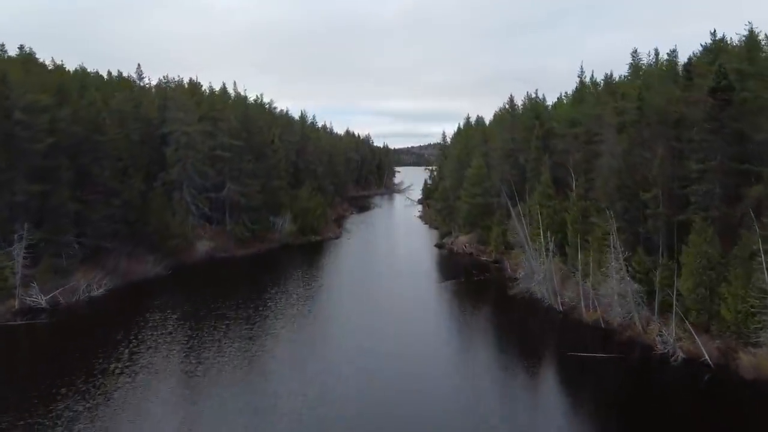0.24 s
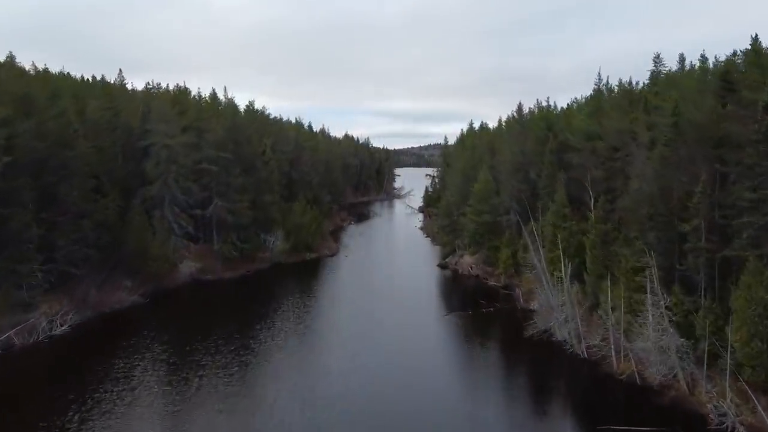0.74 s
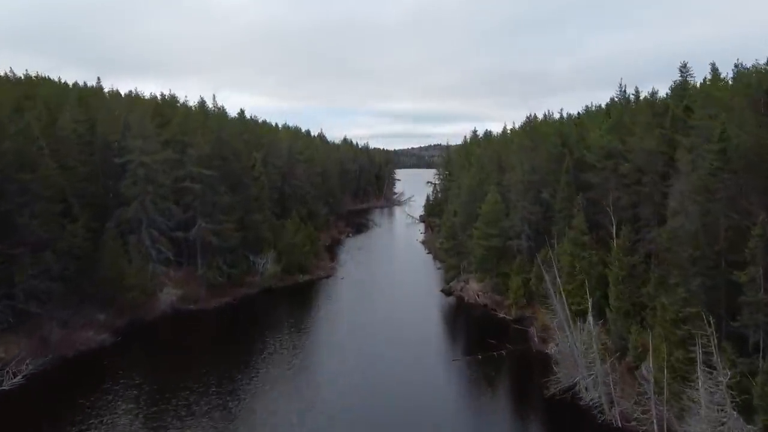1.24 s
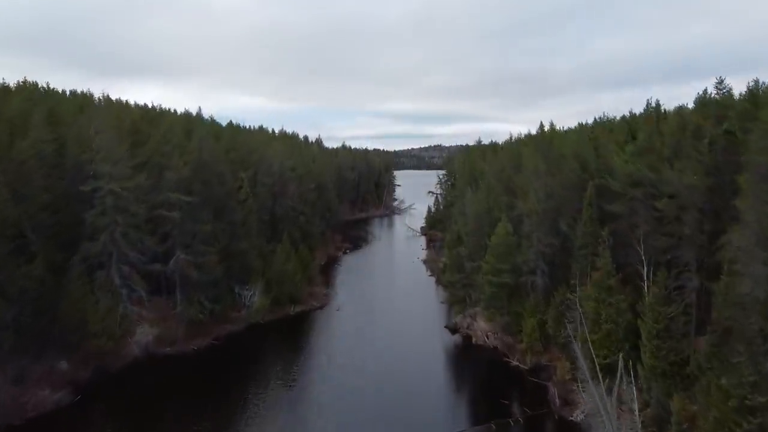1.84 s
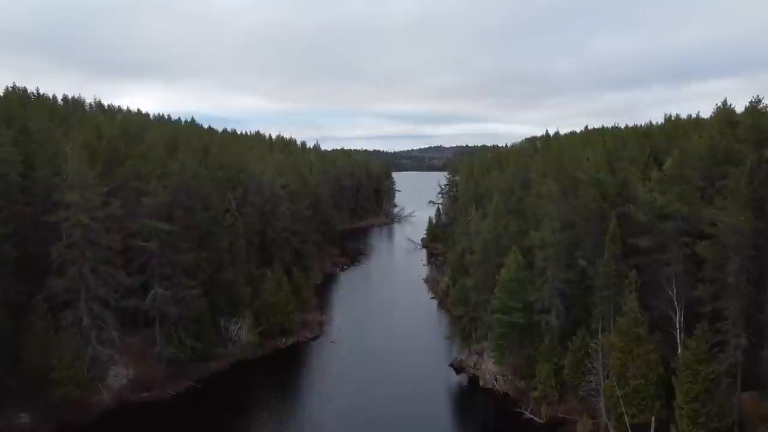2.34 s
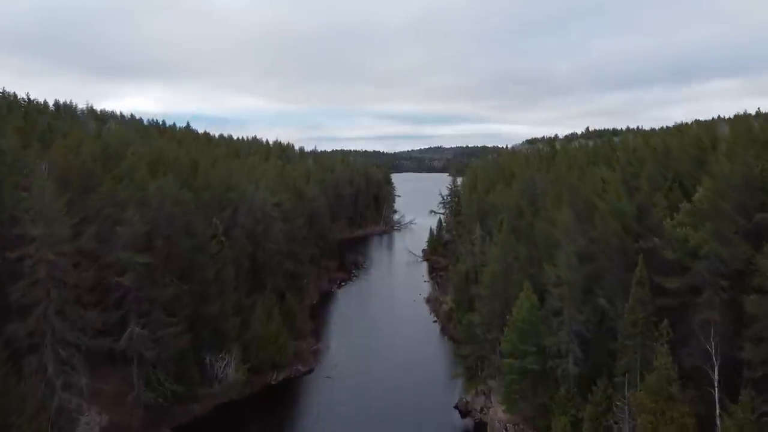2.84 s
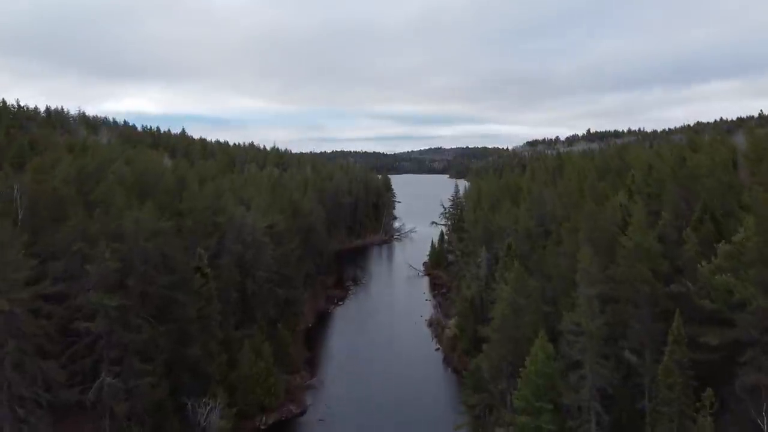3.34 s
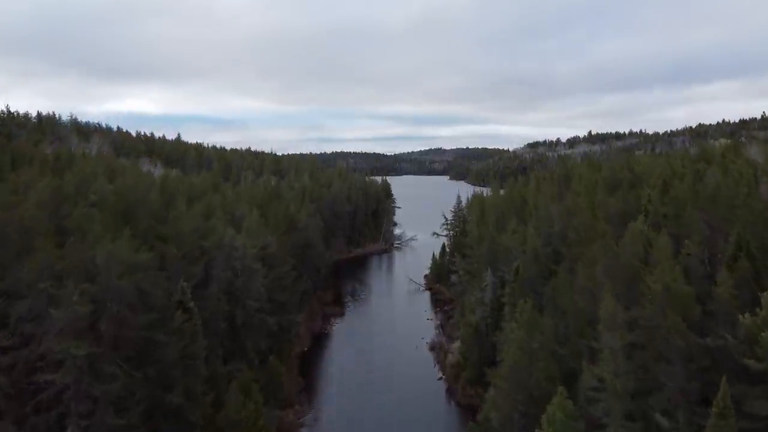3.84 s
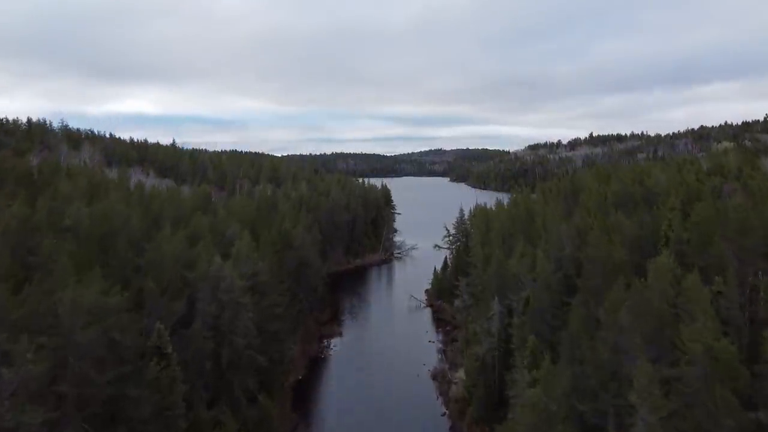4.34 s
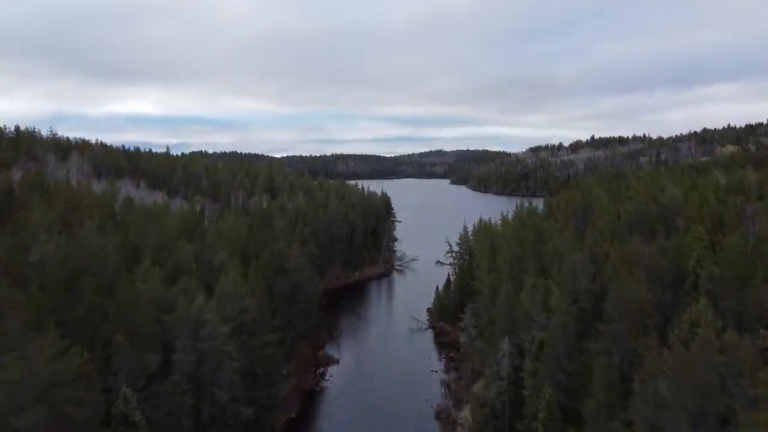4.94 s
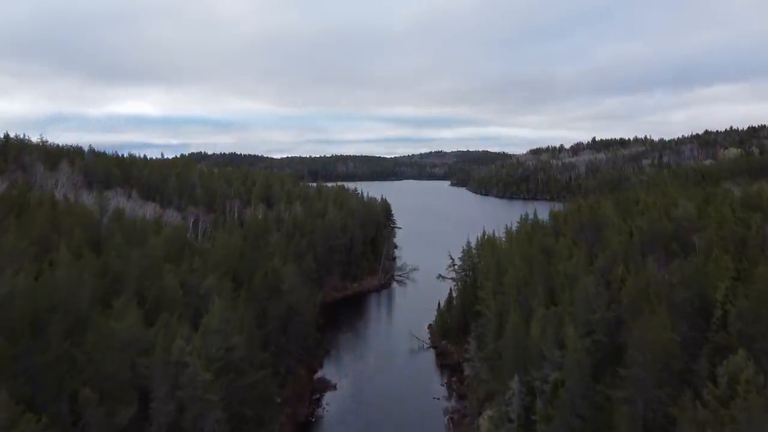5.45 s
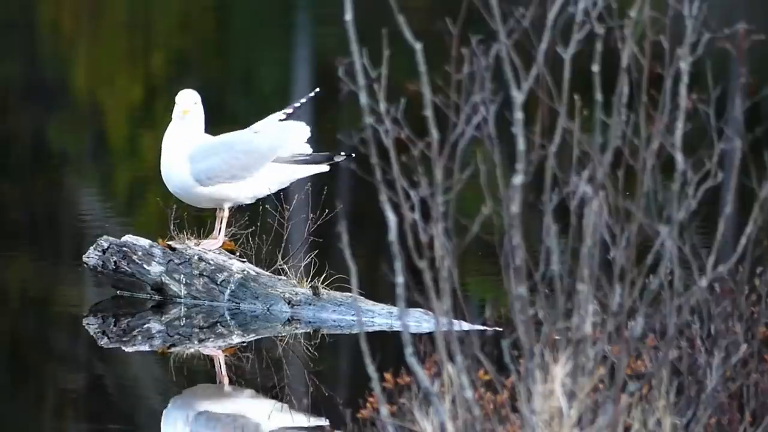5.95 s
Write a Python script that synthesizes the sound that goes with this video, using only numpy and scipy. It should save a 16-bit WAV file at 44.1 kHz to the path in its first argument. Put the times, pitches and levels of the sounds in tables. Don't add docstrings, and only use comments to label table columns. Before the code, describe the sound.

Clear whistled frog peeps ring out over a wooded lake, some steeply rising, some lower, with distant callers, brief croaks, a fast trill and long echoes.

```python
import sys
import numpy as np
from scipy import signal
from scipy.fft import rfft, irfft, next_fast_len
from scipy.io import wavfile
from scipy.ndimage import map_coordinates

SR = 44100
rng = np.random.default_rng(int(sys.argv[2]) if len(sys.argv) > 2 else 0)


def rack_gain(trim_db):
    fader = np.asarray(trim_db, float)
    return 10 ** (fader / 20)


def dump_mix(stems):
    frames = np.atleast_2d(stems).T
    limited = np.clip(frames, -1, 1)
    pcm = np.round(limited * 32767).astype(np.int16)
    wavfile.write(sys.argv[1], SR, pcm)


N = 273861
LEAD_S = 2.8
M = N + round(LEAD_S * SR) + SR // 2

# (frequency [Hz], density [dB per Hz])
AIR = [(15, -40), (54, -14), (110, -18), (300, -11), (500, -11), (900, -12), (2600, -17.5), (3700, -32)]
# (frequency [Hz], density [dB per Hz])
HISS = [(1000, -40), (3600, -27), (5500, -27), (9000, -24), (15000, -19), (16000, -20)]
AIR_DB = -59.5
DRONE_HZ, DRONE_WIDTH_HZ, DRONE_DB = 173, 25, -75.5

# (T60 [s], level [dB])
BANKS = [
    (.3, -27),
    (3.5, -24.3),
]

# (start [s], length [s], resting tone [Hz], level [dB])
RISING_PEEPS = [
    (.689, .209, 2440, -26),
    (1.993, .204, 2470, -26),
    (3.622, .201, 2455, -25.7),
    (4.699, .208, 2450, -26),
    (5.742, .213, 2425, -26),
    (-.3, .21, 2430, -25),
    (-1.6, .21, 2450, -25.5),
]
LOW_PEEPS = [
    (.97, .216, 2072, -21),
    (2.275, .224, 2075, -21),
    (3.319, .232, 2075, -21),
    (4.745, .234, 2078, -21),
    (6.026, .236, 2078, -21),
    (-.55, .22, 2075, -18.5),
    (-1.9, .23, 2075, -21),
]
# (lead [s], length [s], level re peep [dB])
RISING_CREAKS = [
    (.011, .008, -16),
]
LOW_CREAKS = [
    (.009, .003, -18),
    (.0045, .003, -14),
]
# (multiple of half the sac tone [1], level [dB])
RISING_ORDERS = [(1, -30), (2, 2), (3, -28), (4, -45), (5, -43), (6, -44), (7, -56)]
LOW_ORDERS = [(1, -32), (2, -0.5), (3, -29.5), (4, -38), (5, -51), (6, -55), (7, -50), (8, -57)]
FAR_ORDERS = [(1, -32), (2, 0), (3, -33), (4, -44), (5, -46)]
TRILL_ORDERS = [(1, -28), (2, 1), (3, -22), (4, -29), (5, -31), (6, -30), (7, -35), (8, -36)]
# (multiple of a third of the sac tone [1], level [dB])
SLIP_ORDERS = [(1, -46), (2, -25), (2.4, -30), (4, -32), (5, -40), (6, -43)]
# (delay [s], level [dB])
RISING_REEDS = [(.022, -18), (.043, -22), (.07, -26)]
LOW_REEDS = [(.009, -22), (.016, -21), (.045, -29)]
FAR_REEDS = [(.027, -19), (.061, -21)]
HOARSE_REEDS = [(.019, -17), (.032, -17), (.047, -20)]
# (centre [Hz], width [Hz], gain [dB])
GLARE = [(2615, 75, -4.5), (5250, 130, -7), (6250, 380, -11), (6750, 110, -8), (7450, 130, -9),
         (8300, 330, -12)]
RISING_VOICE = dict(climb_hz_per_s=2500, onset_hz=-50, settle_s=.006, tire_hz=35, tire_s=.025,
                    attack_db=15, attack_s=.009, bow_db=6, fullest=.55, release_db=5, release_s=.006)
LOW_VOICE = dict(climb_hz_per_s=1000, onset_hz=190, settle_s=.031, tire_hz=15, tire_s=.015,
                 attack_db=12, attack_s=.003, bow_db=8, fullest=.72, release_db=4, release_s=.007)
CRACK_DB, CRACK_S = -19, .005

# (start [s], length [s], first tone [Hz], last tone [Hz], level [dB])
FAINT_PEEPS = [
    (.8, .145, 2830, 3130, -47),
    (.945, .04, 3200, 3080, -49),
    (2.31, .057, 2320, 2570, -39),
    (2.69, .225, 2700, 3110, -49.5),
    (2.905, .035, 3140, 3000, -51),
    (4.26, .24, 2660, 3200, -47),
    (5.108, .037, 2580, 2740, -47),
    (6.13, .17, 2320, 2900, -41),
]
# (start [s], length [s], level [dB])
HIGH_PEEPS = [
    (1.05, .175, -36),
    (2.688, .182, -34.5),
    (4.41, .165, -34),
]
HIGH_FIRST_HZ, HIGH_LAST_HZ, HIGH_BEND, FAINT_BEND = 2795, 3365, 1.75, 1.21

# (start [s], length [s], pulse rate [Hz], level [dB], unsteadiness [0-1])
CROAKS = [
    (1.838, .026, 845, -54.5, .015),
    (1.861, .06, 730, -56, .1),
    (2.106, .028, 1052, -50, 0.22),
    (3.008, .035, 760, -54, .12),
    (3.05, .05, 800, -57, .25),
    (4.6, .041, 995, -46.5, .003),
    (4.641, .06, 1050, -53, .03),
    (4.641, .09, 900, -54, .25),
]
# (frequency [Hz], gain [dB])
THROAT = [(700, -28.5), (1700, -5), (2250, -3), (3000, 3), (4000, -17), (6000, -24), (8000, -14),
          (10000, -32)]
CROAK_FULL_DB, DULL_PER_DB, SAG_PER_DB = -51, .6, .02

# (start [s], length [s], level [dB])
TRILL = [(2.095, .022, -36), (2.132, .028, -33), (2.181, .022, -33), (2.2245, .022, -33),
         (2.268, .023, -34), (2.307, .023, -34), (2.356, .026, -32.5), (2.405, .027, -34),
         (2.461, .022, -32), (2.51, .023, -33), (2.563, .025, -34), (2.62, .011, -35.5), (2.633, .01, -42)]
TRILL_HZ, TRILL_CLIMB_HZ, TRILL_CLIMB_S = 2135, 60, .3
SHRILL_DB, MELLOW_DB, MELLOWS_AT_S, MELLOWS_IN_S = 16, 2.5, 2.33, .015
TRILL_FULL_DB, SHRILL_PER_DB = -33.5, 2.5


def unit(x):
    return x / np.sqrt(np.mean(x ** 2) + 1e-20)


def along(points, hz):
    f, v = np.transpose(points)
    return np.interp(np.log(hz + 1), np.log(f + 1), v)


def wobble(size, rate_hz):
    knots = rng.standard_normal(size=256)
    return map_coordinates(knots, [np.arange(size) * rate_hz / SR], mode="wrap")


def filtered(x, response):
    m = next_fast_len(len(x) + 8192)
    return irfft(rfft(x, m) * response(np.fft.rfftfreq(m, 1 / SR)), m)[:len(x)]


def bandpass(x, order, low, high):
    return signal.lfilter(*signal.butter(order, [low, high], "bandpass"), x)


def treble_loss(hz):
    return 1 / (1 + (hz / 4200) ** 4)


def add(air, start_s, sound):
    air[round((start_s + LEAD_S) * SR):][:len(sound)] += sound


def reflections(x, reeds):
    return sum(rack_gain(db) * np.roll(x, round(delay_s * SR)) for delay_s, db in reeds)


def stack(hz, orders, drift_db):
    phase = 2 * np.pi * np.cumsum(hz) / SR
    total = np.zeros(len(hz))
    for k, db in orders:
        faintness = np.clip((-db - 24) / 24, 0, 1)
        level_db = db + faintness * drift_db * wobble(len(hz), 24)
        total += rack_gain(level_db) * np.sin(k * phase + rng.uniform(0, 7.1))
    return np.sqrt(2) * total


def background():
    def hiss_response(hz):
        outdoors = rack_gain(along(AIR, hz) - 30 * (hz > 4000))
        return np.hypot(outdoors, rack_gain(along(HISS, hz)))

    def drone_response(hz):
        return np.exp(-((hz - DRONE_HZ) / DRONE_WIDTH_HZ) ** 2)

    hiss = unit(filtered(rng.standard_normal(N), hiss_response))
    drone = unit(filtered(rng.standard_normal(N), drone_response))
    return rack_gain(AIR_DB + .4 * wobble(N, 3)) * hiss + rack_gain(DRONE_DB + 1.5 * wobble(N, 4)) * drone


def echoes(x):
    t = np.arange(3 * SR) / SR
    tail = np.zeros(len(t))
    for t60_s, db in BANKS:
        scatter = rng.standard_normal(len(t)) * rack_gain(-60 * t / t60_s) * np.clip(t / .03, 0, 1)
        tail += rack_gain(db) * scatter / np.linalg.norm(scatter)
    return signal.fftconvolve(x, filtered(tail, treble_loss))[:M]


def course(t, climb_hz_per_s, onset_hz, settle_s, tire_hz, tire_s,
           attack_db, attack_s, bow_db, fullest, release_db, release_s):
    left = t[-1] - t
    lift_hz = climb_hz_per_s * t + onset_hz * np.exp(-t / settle_s) - tire_hz * np.exp(-left / tire_s)
    swell_db = -attack_db * np.exp(-t / attack_s)
    swell_db -= bow_db * (t / t[-1] - fullest) ** 2
    swell_db -= release_db * np.exp(-left / release_s)
    return lift_hz, swell_db


def peep(air, row, voice, orders, creaks, slip_s):
    start_s, length_s, rest_hz, db = row
    t = np.arange(0, length_s, 1 / SR)
    lift_hz, swell_db = course(t, **voice)
    tone_hz = rest_hz + lift_hz
    slipped = np.clip((t - t[-1] + slip_s) / .001, 0, 1)
    ragged_hz = tone_hz / 3 * (1 + .025 * wobble(len(t), 400))
    main = stack(tone_hz / 2, orders[1:2], 0)
    regular = stack(tone_hz / 2, orders[:1] + orders[2:], 3.5)
    overtones = (1 - slipped) * regular + slipped * stack(ragged_hz, SLIP_ORDERS, 2.2)
    edges = np.clip(np.minimum(t / .001, (t[-1] - t) / .0035), 0, 1)
    add(air, start_s, rack_gain(db + swell_db) * edges * (main + overtones))

    crack = bandpass(rng.standard_normal(size=1024), 4, .07, .19)
    add(air, start_s, rack_gain(db + CRACK_DB) * np.exp(-t[:1024] / CRACK_S) * crack)

    for lead_s, span_s, creak_db in creaks:
        v = np.arange(0, span_s, 1 / SR)
        creak = np.sin(np.pi * v / span_s) * np.sin(2 * np.pi * (tone_hz[0] - 60) * v)
        add(air, start_s - lead_s, rack_gain(db + creak_db) * creak)


def near_frog(peeps, voice, orders, creaks, reeds, slip_s):
    def water(hz):
        return rack_gain(sum(db * np.exp(-((hz - centre) / width) ** 2) for centre, width, db in GLARE))

    air = np.zeros(M)
    for row in peeps:
        peep(air, row, voice, orders, creaks, slip_s)
    air = filtered(air, water)
    return air + reflections(filtered(air, treble_loss), reeds)


def far_frogs():
    air = np.zeros(M)
    glides = [(s, length, HIGH_FIRST_HZ, HIGH_LAST_HZ, db, HIGH_BEND) for s, length, db in HIGH_PEEPS]
    glides += [(*row, FAINT_BEND) for row in FAINT_PEEPS]
    for start_s, length_s, first_hz, last_hz, db, bend in glides:
        u = np.arange(0, length_s, 1 / SR) / length_s
        tone_hz = last_hz + (first_hz - last_hz) * (1 - u) ** bend
        edges = np.clip(u / .045, 0, 1) * np.clip((1 - u) / .07, 0, 1)
        swell = edges * rack_gain(-20 * (u - .32) ** 2 + 1.2 * wobble(len(u), 60))
        add(air, start_s, rack_gain(db) * swell * stack(tone_hz / 2, FAR_ORDERS, 7))
    return air + reflections(air, FAR_REEDS)


def croaks():
    air = np.zeros(M)
    for start_s, length_s, hz, db, rough in CROAKS:
        u = np.arange(0, length_s, 1 / SR) / length_s
        weak_db = max(CROAK_FULL_DB - db, 0)
        rate_hz = hz * (1 - SAG_PER_DB * weak_db * u ** 2 + rough * wobble(len(u), 250))
        phase = 2 * np.pi * np.cumsum(rate_hz) / SR
        voice = np.zeros(len(u))
        for k in range(1, 12):
            dull_db = DULL_PER_DB * weak_db * np.log2(1 + k * hz / 3000) ** 2
            voice += rack_gain(along(THROAT, k * rate_hz) - dull_db) * np.sin(k * phase)
        edges = np.clip(np.minimum(u / .04, (1 - u) / .45), 0, 1)
        add(air, start_s, rack_gain(db + 10 * rough * wobble(len(u), 120)) * edges * unit(voice))
    return air


def triller():
    air = np.zeros(M)
    for start_s, length_s, db in TRILL:
        hz = TRILL_HZ + TRILL_CLIMB_HZ * min((start_s - TRILL[0][0]) / TRILL_CLIMB_S, 1)
        early = 1 / (1 + np.exp((start_s - MELLOWS_AT_S) / MELLOWS_IN_S))
        shrill_db = MELLOW_DB + (SHRILL_DB - MELLOW_DB) * early
        shrill_db = max(shrill_db + SHRILL_PER_DB * min(db - TRILL_FULL_DB, 0), -9)
        orders = [(k, level_db + shrill_db * np.exp(-((k * hz / 2 - 8300) / 700) ** 2))
                  for k, level_db in TRILL_ORDERS]

        u = np.arange(0, length_s, 1 / SR) / length_s
        unsteady = .005 + .05 * np.exp(-u / .12) + .03 * u ** 8
        tone_hz = hz * (1.03 - .06 * u) * (1 + unsteady * wobble(len(u), 500))
        flutter = rack_gain(1.5 * wobble(len(u), 250))
        scratch = rack_gain(-28 + .5 * shrill_db - 8 * u) * rng.standard_normal(len(u))
        voice = flutter * stack(tone_hz / 2, orders, 3)
        voice += bandpass(scratch, 2, .2, .41)
        voice += rack_gain(.4 * shrill_db + 3) * bandpass(scratch, 2, .34, .385)
        add(air, start_s, rack_gain(db - 1.5) * np.sin(np.pi * u) ** .4 * voice)
    return air


def hoarse_frog():
    air = croaks() + triller()
    return air + reflections(air, HOARSE_REEDS)


def scene():
    rising = near_frog(RISING_PEEPS, RISING_VOICE, RISING_ORDERS, RISING_CREAKS, RISING_REEDS, slip_s=.008)
    low = near_frog(LOW_PEEPS, LOW_VOICE, LOW_ORDERS, LOW_CREAKS, LOW_REEDS, slip_s=.014)
    near, far, hoarse = low + rising, far_frogs(), hoarse_frog()
    frogs = near + hoarse + far + echoes(near + rack_gain(3) * hoarse + rack_gain(6) * far)
    return (frogs[round(LEAD_S * SR):][:N] + background())[None]


def top_cut(x):
    return signal.sosfilt(signal.butter(12, 16670, fs=SR, output="sos"), x)


def record(dry):
    def microphone(hz):
        dip = 1 - 0.9 * np.exp(-((hz - 5930) / 90) ** 2)
        return dip * (hz < 15780)

    mix = filtered(dry[0], microphone)[None]
    return top_cut(mix)


dry = scene()
out = record(dry)
dump_mix(out)
```